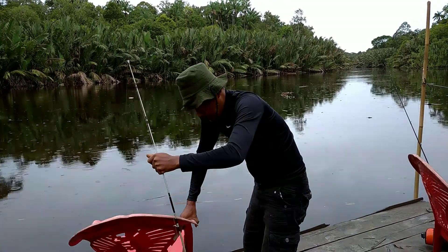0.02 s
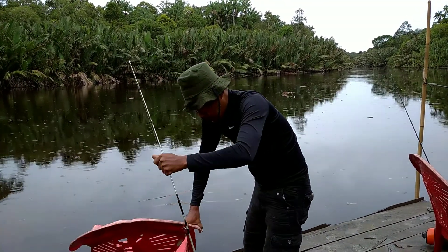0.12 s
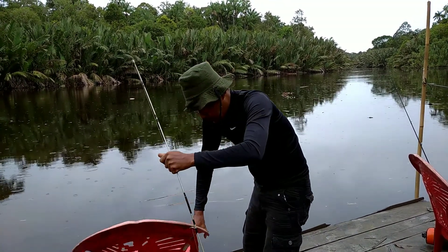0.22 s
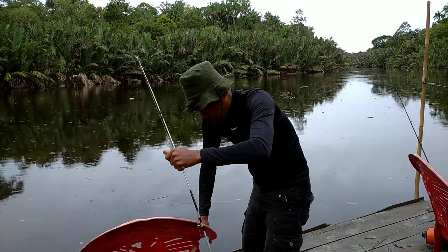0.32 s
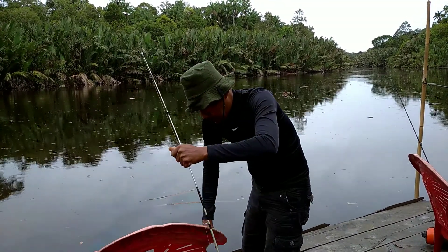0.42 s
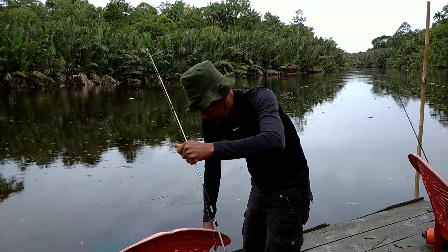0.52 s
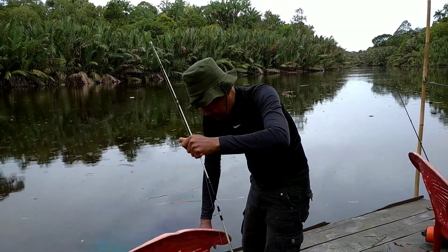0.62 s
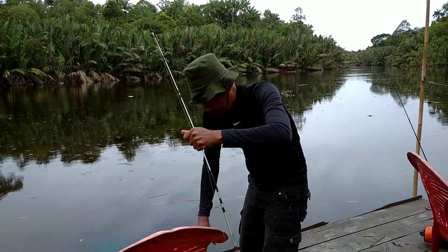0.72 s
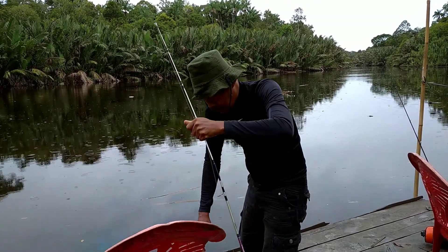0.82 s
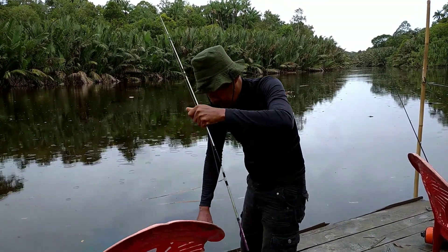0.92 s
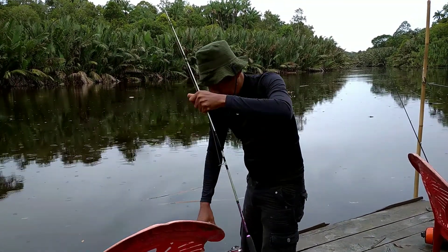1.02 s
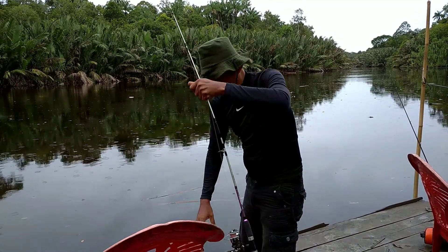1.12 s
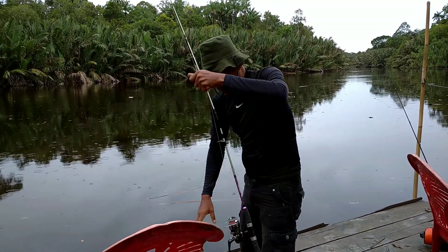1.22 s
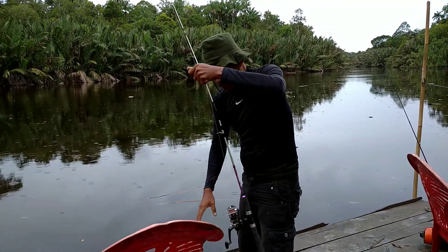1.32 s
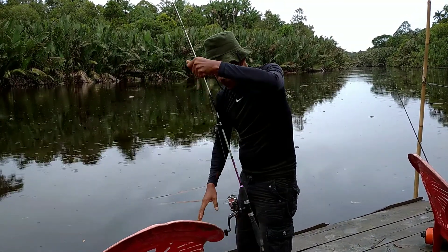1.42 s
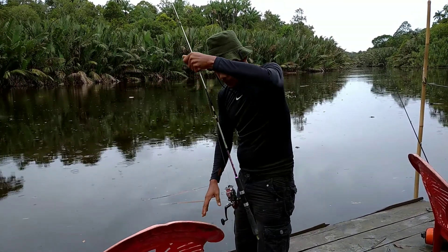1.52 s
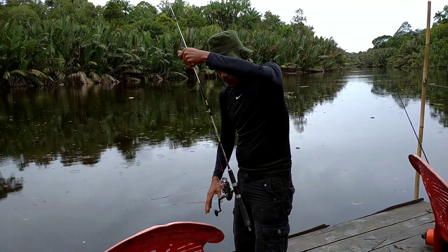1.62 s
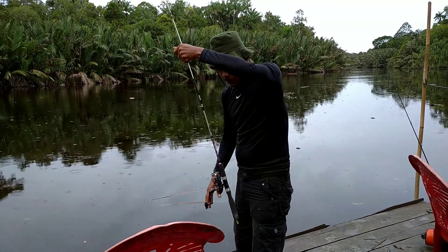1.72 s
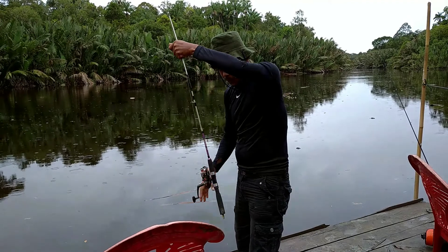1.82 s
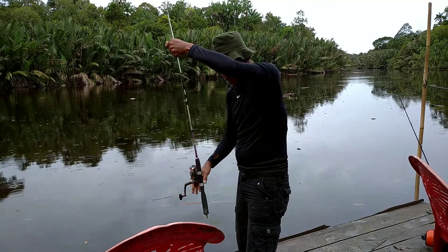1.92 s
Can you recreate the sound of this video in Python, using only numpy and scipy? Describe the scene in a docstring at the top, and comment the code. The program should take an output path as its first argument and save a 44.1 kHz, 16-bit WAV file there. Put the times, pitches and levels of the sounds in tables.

```python
"""A plastic chair is dragged in short jerks over jetty planks, knocks several times and rattles to rest.
Stick-slip clicks and damped swings drive its hollow body, which booms on the left, and its thin shell.
Shaped noise gives the high hiss of insects, a pulsed tone a cricket.
Soft damped taps and dry noise ticks are mixed in; gliding tones are distant birds across the river."""
import sys
import numpy as np
from scipy import signal
from scipy.fft import rfft, irfft
from scipy.io import wavfile
from scipy.ndimage import uniform_filter1d

SR = 44100
rng = np.random.default_rng(int(sys.argv[2]) if len(sys.argv) > 2 else 0)


def pcm_store(signal):
    """Save signal as 16-bit PCM."""
    levels = np.round(np.clip(np.atleast_2d(signal), -1, 1) * 32767)
    wavfile.write(sys.argv[1], SR, levels.astype(np.int16).T)


N = 88200
T = np.arange(N) / SR

# leg scrapes: start_s, length_s, boom_db, rasp_db, grit_db, twang_hz, twang_db
SCRAPES = [(0.0, 0.038, -46, -51, -57, 870, -71), (.021, 0.0059, -61, -52, -61, 1120, -51),
           (.052, 0.0082, -42.5, -44, -50.5, 1120, -42), (0.07, 0.02, -37, -49.5, -52, 830, -47),
           (0.124, 0.0069, -40.5, -40.5, -49, 1140, -42), (0.14, 0.034, -42.5, -45.5, -51.5, 1050, -44.5),
           (.184, 0.027, -42, -45, -53, 1150, -49.5), (0.2163, 0.012, -38.5, -37.5, -46.5, 1072, -36),
           (0.237, 0.016, -49.5, -55, -51, 674, -42.5), (0.2598, 0.016, -39.5, -37.5, -43, 1160, -33.5),
           (.288, 0.012, -38.5, -36, -38, 1080, -34), (0.311, 0.0098, -49, -63, -54, 794, -57),
           (0.3373, 0.0085, -40, -34, -37, 1117, -32.5), (0.349, 0.012, -37.5, -32.5, -37.5, 1770, -29.5),
           (.362, 0.017, -33.5, -31.5, -38.5, 730, -52), (0.377, 0.016, -36.5, -33, -39.5, 1568, -30.5),
           (0.399, 0.014, -42, -29.5, -33, 1134, -25.5), (0.418, 0.057, -40, -38, -42.5, 2330, -38.5),
           (.435, 0.025, -28, -31.5, -35, 1150, -31), (.472, 0.015, -43, -43, -53, 550, -46.5),
           (.516, .012, -39.5, -43, -48, 895, -37), (.538, 0.011, -45, -44, -51, 1120, -43),
           (0.564, .165, -49.5, -53, -58.5, 370, -48), (.606, 0.014, -44, -49.5, -54, 680, -44),
           (0.642, .016, -40.5, -54, -61, 360, -43), (0.671, 0.013, -49, -48, -47.5, 800, -49),
           (.696, 0.018, -45, -52, -60, 765, -55), (.751, 0.058, -55.5, -57.5, -67, 500, -66),
           (.794, 0.022, -50.5, -54, -64, 680, -49.5), (0.829, 0.052, -66, -56, -55, 2130, -56),
           (0.879, 0.043, -51, -55, -57, 290, -56), (.905, 0.0085, -46, -46, -48.5, 1030, -54),
           (.922, 0.051, -33.5, -39.5, -43, 1090, -45), (.976, 0.037, -43, -47, -47.5, 1030, -39.5)]
# leg strikes on the planks: start_s, thud_hz, decay_cycles (to 1/e), thud_db, clack_db, grit_db
KNOCKS = [(.001, 144.4, 1.13, -32.5, -45.5, -60), (.134, 163, 2.8, -37.5, -46, -53),
          (0.4354, 367, 1.6, -19, -49, -59), (0.4446, 1134, 4.9, -16, -22, -33.5),
          (0.4478, 385.5, 4.5, -17, -27, -47), (0.474, 333, 0.73, -29, -42, -49),
          (0.502, 630, 2.3, -32.5, -26.5, -37), (0.5053, 295, 2.6, -28.5, -52, -41),
          (0.5197, 182, 1.6, -26.5, -54, -73), (.681, 1030, 2.8, -22, -26.5, -39),
          (.683, 1627, 4.2, -26, -33, -39.5), (.685, 749, 2.8, -22, -36, -69),
          (0.6876, 366, 1, -21.5, -34, -42), (0.9124, 1104, 1.68, -17, -22, -48),
          (0.9167, 223.5, 4, -24.5, -33, -41), (.941, 203, 3, -28.5, -32.5, -39),
          (0.9565, 220, 0.76, -26, -33.5, -45.5), (.988, 353, 4.5, -31.5, -37, -44),
          (0.999, 210, 1.6, -36, -55, -53), (1.023, 215, 1.4, -36, -46.5, -53),
          (1.042, 319, 3.4, -50, -47, -54), (1.075, 207, 2.3, -43, -54.5, -78),
          (1.106, 210, 1.5, -50, -73.5, -83)]
# fine hiss of the feet skidding as the chair settles: time_s, level_db
SKID_LEVEL = [(.9, -63), (.94, -47), (.97, -50), (1.02, -55.5), (1.06, -67)]
# soft taps on the left: start_s, pitch_hz, level_db
TAPS = [(1.3468, 146, -45.5), (1.3927, 166, -45), (1.411, 145, -44.5), (1.809, 141, -38),
        (1.8235, 255, -42.5), (1.8514, 159, -42.5)]
# light ticks of plastic and fishing tackle: start_s, level_db
TICKS = [(0.023, -64), (0.163, -42), (0.856, -39), (1.809, -53.5), (1.823, -65), (1.8968, -46)]
# distant bird notes: start_s, length_s, first_hz, last_hz, arch_hz, level_db
BIRD_NOTES = [(1.084, 0.1684, 1246, 1148, 20.4, -67), (1.272, 0.053, 3800, 4620, 36, -66),
              (1.335, 0.019, 4600, 4670, 43, -65), (1.372, .036, 4670, 3840, 42, -60.5),
              (1.966, 0.014, 4730, 4450, 17, -68)]

# modes of the chair on the planks: mode_hz, relative_db, t60_s
BODY_MODES = [(136, -5, .18), (158, -8, .16), (183, -4, .24), (219, 0, .27), (244, -3, .22), (305, -5, .18),
              (357, -1, .22), (405, -1, .16), (431, -9, .18), (538, -5, .17), (645, -13, .16),
              (764, -13, .16)]
# modes of the thin shell: mode_hz, relative_db, t60_s
SHELL_MODES = [(564, 0, 0.11), (705, -2.5, 0.12), (830, 2.5, 0.092), (877, -1.5, 0.068), (1030, 0.5, 0.1),
               (1150, 2, 0.12), (1438, 6, 0.04), (1473, 3.5, .07), (1632, -11, 0.056), (1782, 4, 0.079),
               (1977, -6.5, 0.067), (2245, 8.5, 0.044), (2378, -6.5, 0.042), (2788, -3.5, 0.058)]

# spectrum of the body under a scrape: freq_hz, relative_db
BOOM_COLOUR = [(30, -59.5), (80, -15), (135, -0.5), (230, -0.5), (290, -0.5), (380, 0), (500, -15),
               (900, -35.5), (3000, -53.5)]
# spectrum of the scraping shell: freq_hz, relative_db
RASP_COLOUR = [(150, -30.5), (450, -5.5), (750, -2.5), (1150, 1.5), (1400, -4), (1850, 0.5), (2400, 1),
               (3000, 3), (5000, -34.5)]
# spectrum of the struck shell: freq_hz, relative_db
CLACK_COLOUR = [(30, -32.5), (150, 4), (450, 0.5), (750, -8.5), (1100, -1), (1350, -6), (1800, -0.5),
                (2400, -10.5), (3200, -12), (6000, -48.5)]
# spectrum of grit under a scraping leg: freq_hz, relative_db
GRIT_COLOUR = [(800, -58.5), (2300, 4.5), (3200, -2), (4550, -4), (5300, -15.5), (6500, -18), (9100, -7),
               (10300, -21), (14000, -36)]
# spectrum of grit under a striking leg: freq_hz, relative_db
CRACK_COLOUR = [(800, -31.5), (2300, 8.5), (3200, 1), (4550, 0.5), (5300, -12.5), (6500, -16.5),
                (9100, -11.5), (10300, -30), (14000, -26.5)]
# spectrum of the skid: freq_hz, relative_db
SKID_COLOUR = [(2000, -29.5), (5500, -1), (8500, 4.5), (10500, -8.5), (14000, -7)]
# filter on thuds and twangs: freq_hz, gain_db
THUD_FILTER = [(25, -14), (70, -14), (130, 0.5), (250, 1), (1200, -3), (2500, 4.5), (8000, -10.5)]
# filter on the soft taps: freq_hz, gain_db
TAP_FILTER = [(25, -31), (60, -10), (120, 2), (500, -0.5), (3000, 15)]
# spectrum of the ticks: freq_hz, relative_db
TICK_COLOUR = [(300, -35), (2300, 27), (4500, 9.5), (12000, -28)]

# spectrum of open air and insect chorus: freq_hz, relative_db
AIR_COLOUR = [(25, -30), (60, -9.5), (110, 5), (230, -4), (550, -6), (1400, -12), (2100, -4.5), (3150, -12),
              (4400, -10.5), (5300, -23), (5950, -8), (7000, -8.5), (8100, -9.5), (9300, -25),
              (14000, -21.5)]
# left-right likeness of the air: freq_hz, correlation
AIR_SAME = [(60, 0.92), (280, 0.55), (1200, 0.017), (14000, 0.011)]
# right channel of the air over the left: freq_hz, gain_db
AIR_RIGHT = [(200, -14.5), (700, 0.0), (4000, 0.1), (7500, 4.5), (12000, -1.5)]

# right channel of the chair, level: freq_hz, gain_db
RIGHT_LEVEL = [(50, -35), (110, -9.5), (220, -14.5), (370, -13.5), (520, -0.5), (700, 0.5), (1150, -4),
               (2200, -1.5), (4200, -0.5), (8000, -1.5), (14000, -2.5)]
# right channel of the chair, phase: freq_hz, lead_rad
RIGHT_PHASE = [(50, 1), (500, -1.14), (1150, 0.58), (1650, 2), (2400, 2), (4600, 6), (9000, 10)]
# decay of the deck: freq_hz, t60_s
DECK_T60 = [(150, 0.42), (1000, 0.25), (4000, 0.36), (12000, 0.1)]
# decay among the trees: freq_hz, t60_s
FOREST_T60 = [(1200, 0.35), (4500, 0.85)]
# returns from the far bank: delay_s, gain_db
BANK = [(.034, -9), (.075, -10), (.125, -11)]

SLIPS_PER_S, SLIP_SPREAD_DB = 2600, 3.5
GRIP_RISE_S, BITE, BITE_DECAY_S, RELEASE_S = .0025, .5, .006, 0.0081
JUDDER_HZ, JUDDER_DB = 260, 1.3
CONTACT_DECAY_S, CONTACT_PATCH_S = .002, .012
TWANG_DECAY_S, TWANG_ROUGH_DB = 0.0062, 3
CHATTER_RISE_S, CHATTER_DECAY_S, THUD_RISE_S = 0.00092, 0.0062, 0.00099
BOOM_TOP_HZ, BOOM_KICK_DB = 520, 16  # thuds below this pitch set the body ringing
BODY_RING_DB, SHELL_RING_DB, CLACK_RING_DB = -7, -6, -15.5
SHELL_SAME, GRIT_SAME = 0.87, 0.18  # left-right correlation
DECK_DB = -14
AIR_DB, AIR_PATCH_DB = -59.5, 2.5
CRICKET_HZ, CRICKET_WANDER_HZ, CRICKET_PERIOD_S, CRICKET_PEAK_S = 7025, 25, .0685, 1.084
CRICKET_DB, CRICKET_SWELL_DB = -72.5, 2.5
TAP_DECAY_CYCLES, TAP_RIGHT_DB, TICK_DECAY_S = 0.58, -31, .0018
BIRD_WAVER_HZ = 50
EDGE_HZ = 14300


def amp(db):
    """Decibels to gain."""
    return 10 ** (np.asarray(db) / 20)


def unit(x):
    """Scales to rms 1."""
    return x / np.sqrt(np.mean(x ** 2) + 1e-20)


def read(points, hz):
    """Interpolates a table on a log-frequency axis."""
    f, value = np.transpose(points)
    return np.interp(np.log(hz + 1), np.log(f + 1), value)


def add(mix, start_s, sound):
    """Mixes a sound in at start_s."""
    part = mix[..., max(round(start_s * SR), 0):][..., :sound.shape[-1]]
    part += sound[..., :part.shape[-1]]


def through(x, response):
    """Convolves, channel by channel."""
    return signal.fftconvolve(np.atleast_2d(x), np.atleast_2d(response), axes=1)[:, :N]


def colour(points, size=4096):
    """Minimum-phase response with the given spectrum."""
    log_gain = np.log(amp(read(points, abs(np.fft.fftfreq(size, 1 / SR)))))
    spectrum = np.exp(np.conj(signal.hilbert(log_gain)))
    return np.fft.ifft(spectrum).real[:size // 2]


def tinted(x, points):
    """Filters with a response of energy 1, so white noise keeps its power."""
    response = colour(points)
    return through(x, response / np.linalg.norm(response))


def ring(modes):
    """Sum of decaying sines, alternating in sign, energy 1."""
    t = T[:SR // 2]
    response = np.zeros(len(t))
    for k, (hz, db, t60_s) in enumerate(modes):
        response += (-1) ** k * amp(db - 60 * t / t60_s) * np.sin(2 * np.pi * hz * t)
    return response / np.linalg.norm(response)


def pair(two, same):
    """Gives two unrelated signals a left-right correlation."""
    same = np.clip(same, -1, 1)
    return np.array([two[0], same * two[0] + np.sqrt(1 - same ** 2) * two[1]])


def drift(rate_hz):
    """Random wander, low-passed near rate_hz, rms 1."""
    rolloff = 1 + (np.fft.rfftfreq(N, 1 / SR) / rate_hz) ** 4
    return unit(irfft(rfft(rng.standard_normal(N)) / rolloff, N))


def echoes(x, t60):
    """Diffuse stereo reflections: noise whose bands die at their own speeds."""
    hz, t, z = signal.stft(rng.standard_normal((2, SR)), SR, nperseg=256)
    fade = amp(-60 * t / read(t60, hz)[:, None])
    tail = signal.istft(z * fade, SR, nperseg=256)[1]
    return through(x, tail / np.linalg.norm(tail[0]))


def slips(t):
    """Stick-slip: random clicks of uneven size and sign, two trains, rms 1."""
    size = amp(SLIP_SPREAD_DB * np.minimum(rng.exponential(1, (2, len(t))), 3))
    fires = rng.random(size.shape) < SLIPS_PER_S / SR
    return unit(size * rng.choice([-1, 1], size.shape) * fires)


def contact(x):
    """Wood under a leg: four brief random resonances taken in turn, one per patch crossed."""
    t = T[:SR // 80]
    responses = rng.standard_normal((4, len(t))) * np.exp(-t / CONTACT_DECAY_S)
    patch = (T[:x.shape[1]] // CONTACT_PATCH_S) % len(responses)
    rung = sum(through(x * (patch == k), r / np.linalg.norm(r)) for k, r in enumerate(responses))
    return unit(x + rung[:, :x.shape[1]])


def thud(hz, decay_cycles):
    """A heavily damped swing of plank or plastic with a soft onset."""
    t = T[:SR // 6]
    onset = 1 - np.exp(-(t / THUD_RISE_S) ** 2)
    return 2 * onset * np.exp(-t * hz / decay_cycles) * np.sin(2 * np.pi * hz * t)


def scrapes():
    """Dragged legs: stick-slip strokes that bite, judder and release, each with a leg's twang."""
    rasp, grit = np.zeros((2, 2, N))
    boom, twangs = np.zeros((2, N))
    t = T[:SR // 5]
    for start_s, length_s, boom_db, rasp_db, grit_db, twang_hz, twang_db in SCRAPES:
        judder = unit(amp(JUDDER_DB * np.clip(drift(JUDDER_HZ)[:len(t)], -2, 2)))
        # a leg bites hardest as it starts to slide
        grip = np.minimum(t / GRIP_RISE_S, 1) * (1 + BITE * np.exp(-t / BITE_DECAY_S))
        release = np.exp(-np.maximum(t - length_s, 0) / RELEASE_S)
        stroke = contact(slips(t)) * judder * grip * release
        add(boom, start_s, amp(boom_db) * stroke[0])
        add(rasp, start_s, amp(rasp_db) * stroke)
        add(grit, start_s, amp(grit_db) * stroke)
        # the leg twangs as it breaks free
        twang = thud(twang_hz, twang_hz * TWANG_DECAY_S)
        rough_db = TWANG_ROUGH_DB * drift(JUDDER_HZ)[:len(twang)]
        add(twangs, start_s, amp(twang_db + rough_db) * twang)
    return boom, rasp, grit, twangs


def knocks():
    """Legs striking planks: a damped thud, a burst of chatter and, if low, a kick to the body."""
    clack, crack = np.zeros((2, 2, N))
    kicks, thuds = np.zeros((2, N))
    t = T[:SR // 5]
    for start_s, hz, decay_cycles, thud_db, clack_db, grit_db in KNOCKS:
        chatter = slips(t) * np.exp(-t / CHATTER_DECAY_S) * (1 - np.exp(-(t / CHATTER_RISE_S) ** 2))
        # equal energy for every burst
        chatter *= np.sqrt(CHATTER_DECAY_S * SR) / (np.linalg.norm(chatter, axis=1, keepdims=True) + 1e-9)
        add(clack, start_s, amp(clack_db) * chatter)
        add(crack, start_s, amp(grit_db) * chatter)
        add(thuds, start_s, amp(thud_db) * thud(hz, decay_cycles))
        add(kicks, start_s, (hz < BOOM_TOP_HZ) * amp([thud_db + BOOM_KICK_DB]))
    return kicks, clack, crack, thuds


def skid():
    """Settling feet: stick-slip clicks under a level curve, filtered to a hiss."""
    level_db = np.interp(T, *np.transpose(SKID_LEVEL), left=-120, right=-120)
    return tinted(slips(T) * amp(level_db), SKID_COLOUR)


def heard(x):
    """Shades the right microphone in the bass and puts it out of step by frequency."""
    hz = np.fft.rfftfreq(2 * N, 1 / SR)
    right = rfft(x[1], 2 * N) * amp(read(RIGHT_LEVEL, hz)) * np.exp(1j * read(RIGHT_PHASE, hz))
    return np.array([x[0], irfft(right)[:N]])


def chair():
    """Scrapes and knocks drive the hollow body, the thin shell and the grit under the legs."""
    boom, rasp, grit, twangs = scrapes()
    kicks, clack, crack, thuds = knocks()
    rasp, clack = pair(rasp, SHELL_SAME), pair(clack, SHELL_SAME)

    body = tinted(boom, BOOM_COLOUR)
    body += through(kicks + amp(BODY_RING_DB) * boom, ring(BODY_MODES))
    body += through(thuds + twangs, colour(THUD_FILTER))

    shell_drive = amp(SHELL_RING_DB) * rasp + amp(CLACK_RING_DB) * clack
    shell = tinted(rasp, RASP_COLOUR) + tinted(clack, CLACK_COLOUR)
    shell += through(shell_drive, ring(SHELL_MODES))

    treble = tinted(pair(grit, GRIT_SAME), GRIT_COLOUR)
    treble += tinted(pair(crack, GRIT_SAME), CRACK_COLOUR) + skid()
    return heard(body + shell + treble)


def chorus():
    """Distant insects over faint open air: shaped stereo noise, patchy in time and frequency."""
    hz = np.fft.rfftfreq(1024, 1 / SR)
    a, b, patches = rng.standard_normal((3, 2, N // 256 + 5, len(hz)))
    patches = uniform_filter1d(patches, size=12, axis=1)
    patches = unit(uniform_filter1d(patches, size=12, axis=2))
    z = pair(a + 1j * b, read(AIR_SAME, hz))
    z = z * amp(read(AIR_COLOUR, hz) + AIR_PATCH_DB * patches)
    z[1] *= amp(read(AIR_RIGHT, hz))
    noise = signal.istft(z.swapaxes(1, 2), nperseg=1024, noverlap=768)[1][:, :N]
    return amp(AIR_DB) * unit(noise)


def cricket():
    """A slightly wandering tone in regular pulses, swelling at random."""
    throb = np.cos(np.pi * (T - CRICKET_PEAK_S) / CRICKET_PERIOD_S) ** 4
    hz = CRICKET_HZ + CRICKET_WANDER_HZ * drift(120)
    note = np.sin(2 * np.pi * np.cumsum(hz) / SR)
    swell = amp(CRICKET_SWELL_DB * drift(4.5))
    return amp(CRICKET_DB) * unit(throb * note * swell)


def taps():
    """Soft taps are short damped swings on the left; dry ticks are decaying noise."""
    dull, dry_ticks = np.zeros(N), np.zeros((2, N))
    t = T[:SR // 30]
    for start_s, hz, db in TAPS:
        add(dull, start_s, -amp(db) * thud(hz, TAP_DECAY_CYCLES))
    for start_s, db in TICKS:
        add(dry_ticks, start_s, amp(db) * rng.standard_normal((2, len(t))) * np.exp(-t / TICK_DECAY_S))
    left_right = np.array([[1], [amp(TAP_RIGHT_DB)]])
    return left_right * through(dull, colour(TAP_FILTER)) + tinted(dry_ticks, TICK_COLOUR)


def birds():
    """Faint gliding whistles that echo off the far bank and linger among the trees."""
    song = np.zeros(N)
    for start_s, length_s, first_hz, last_hz, arch_hz, db in BIRD_NOTES:
        u = np.arange(0, length_s, 1 / SR) / length_s
        arch = np.sin(np.pi * u)
        hz = first_hz + (last_hz - first_hz) * u + arch_hz * arch
        hz += BIRD_WAVER_HZ * drift(230)[:len(u)]
        whistle = np.sin(2 * np.pi * np.cumsum(hz) / SR)
        add(song, start_s, amp(db) * np.sqrt(2 * abs(arch)) * whistle)
    returned = echoes(song, FOREST_T60)
    for delay_s, db in BANK:
        add(returned, delay_s, amp(db) * song)
    return song + returned


def scene():
    """The chair with the ring of the deck, then the small sounds around it."""
    near = chair()
    deck = amp(DECK_DB) * echoes(near, DECK_T60)
    return near + deck + chorus() + cricket() + taps() + birds()


def record(dry):
    """Linear-phase low-pass at EDGE_HZ."""
    lowpass = signal.firwin(511, EDGE_HZ, window=("kaiser", 9), fs=SR)
    return signal.oaconvolve(dry, lowpass[None], "same")


dry = scene()
out = record(dry)
pcm_store(out)
```